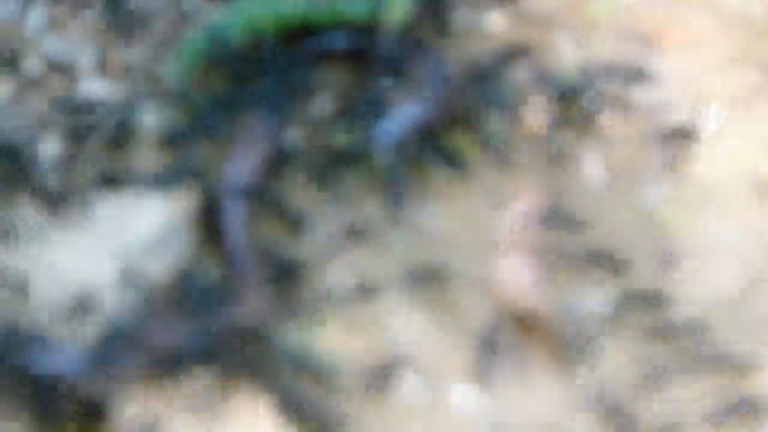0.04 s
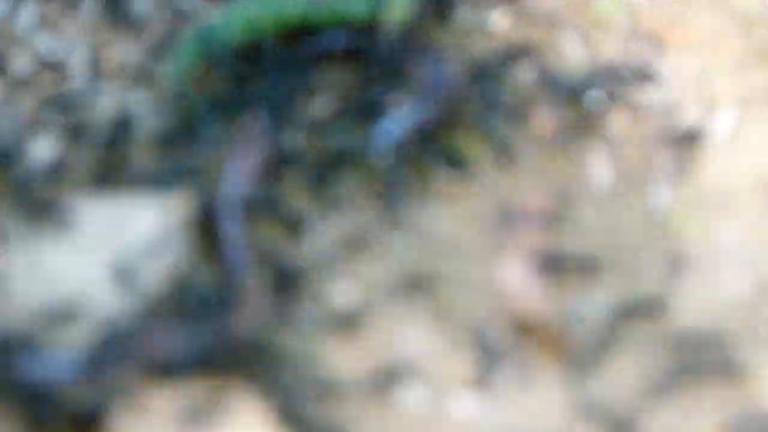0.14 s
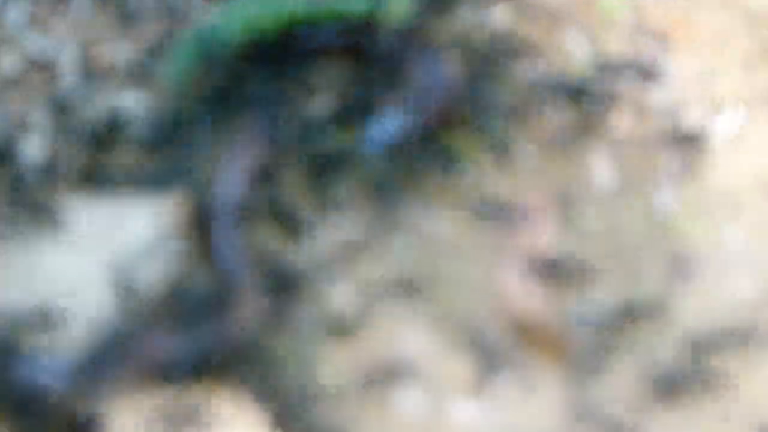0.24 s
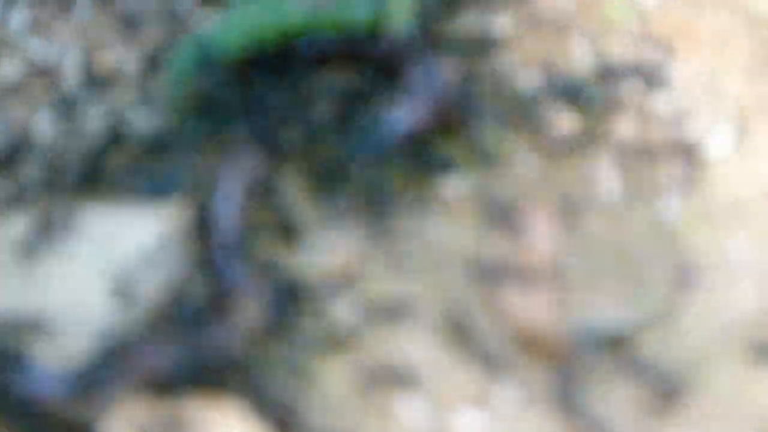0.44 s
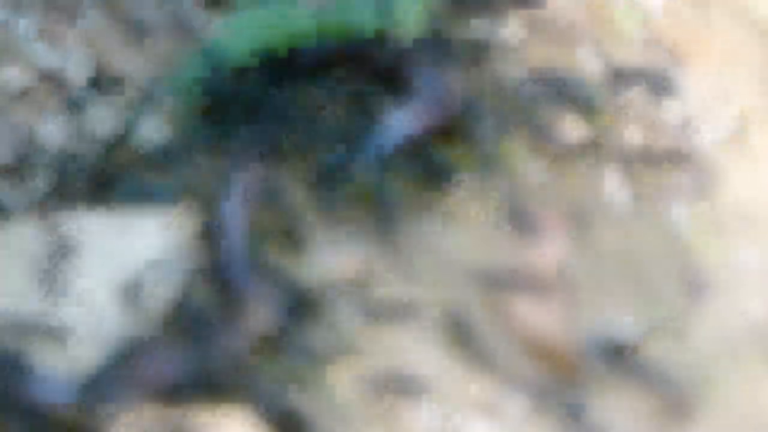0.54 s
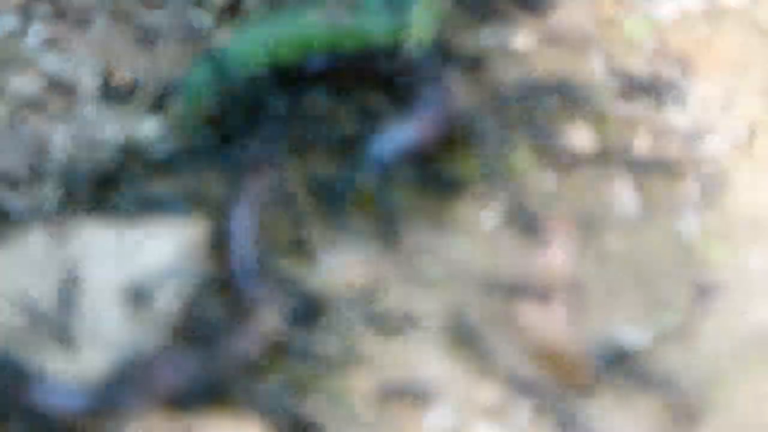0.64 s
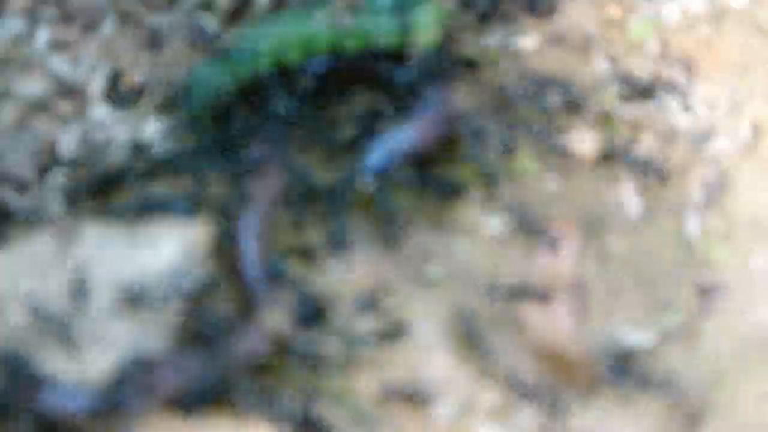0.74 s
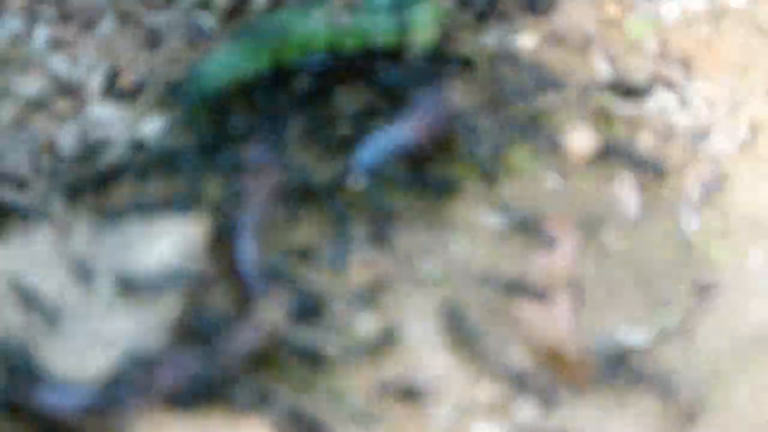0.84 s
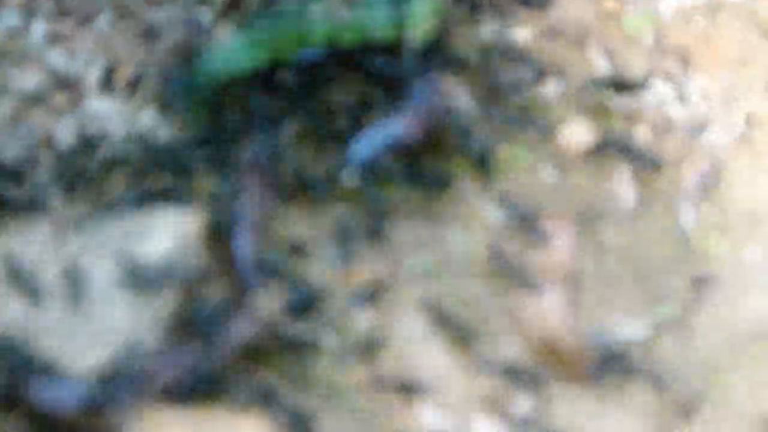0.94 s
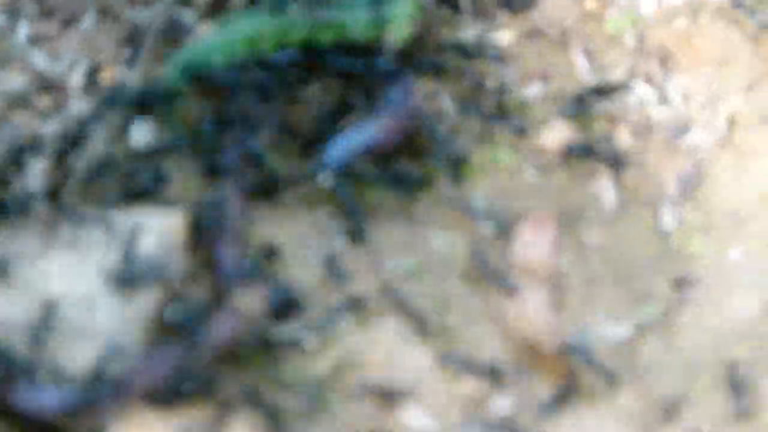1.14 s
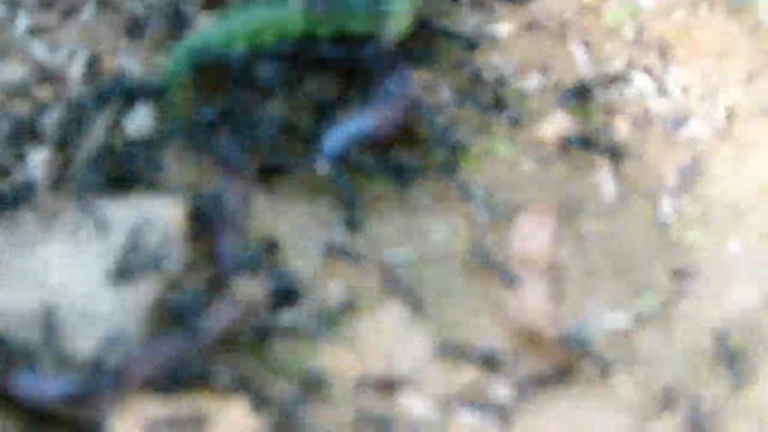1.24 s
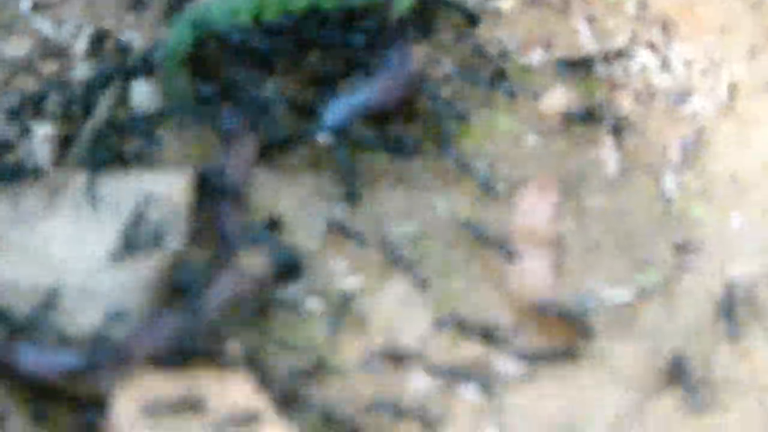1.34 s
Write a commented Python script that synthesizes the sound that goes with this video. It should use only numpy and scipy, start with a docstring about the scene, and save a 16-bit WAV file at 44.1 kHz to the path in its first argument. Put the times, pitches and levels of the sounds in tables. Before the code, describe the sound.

One sharp plastic handling click and a few tiny ticks over steady faint outdoor hiss.

```python
"""A quiet spot outdoors, heard through the two microphone ports of a camera held close to the ground.
From the start there is a steady bed of hiss, a faint hum and the camera's own thin whine.
A tiny tick comes from the grip; then, at 0.14 s, one sharp handling click rings the plastic case
right beside the ports. Soft rubs and two more ticks follow up to 0.6 s, and a last tick at 1.25 s."""
import sys
import numpy as np
from scipy import signal
from scipy.fft import rfft, irfft
from scipy.io import wavfile

SR = 44100
rng = np.random.default_rng(int(sys.argv[2]) if len(sys.argv) > 2 else 0)


def pcm_store(signal):
    """Save signal as 16-bit PCM."""
    levels = np.round(np.clip(np.atleast_2d(signal), -1, 1) * 32767)
    wavfile.write(sys.argv[1], SR, levels.astype(np.int16).T)


N = 61739

# spectrum of the background hiss (frequency [Hz], relative density [dB])
HISS_SPECTRUM = [(25, -30), (70, -25.5), (130, -25.5), (215, -19), (370, -10.5), (560, -11), (760, -3),
                 (930, -8.5), (1130, -5.5), (1450, -9), (1950, -5.5), (2300, -7.5), (2600, -7), (3700, -7),
                 (5300, -4), (7500, -10.5), (9600, -11.5), (13000, -15.5), (15700, -26)]
# how alike the hiss is at the two ports (frequency [Hz], coherence [0-1])
PORT_COHERENCE = [(50, 0.1), (150, 0.85), (600, 0.74), (1050, 0.03), (1600, 0.64), (3500, 0.3),
                  (5200, 0.98), (9000, 0.3), (13000, 0.42), (15500, 0.1)]
# tilt of the hiss toward the right port (frequency [Hz], right over left before panning [dB])
HISS_RIGHT_LIFT = [(1200, -0.5), (2300, 2), (4500, 2), (8000, .5), (13000, 0)]
# slight rise and fall of the hiss (time [s], gain [dB])
HISS_SWELL = [(0, -2), (.12, -1), (.25, -2), (.45, -0.7), (.7, 0.5), (1.0, 0), (1.4, -0.1)]
# tones of the hum (frequency [Hz], relative level [dB])
HUM_TONES = [(287, -77), (380, -71), (467.3, -64), (702, -66)]
# swell of the strongest hum tone (time [s], gain [dB])
HUM_SWELL = [(0, -14), (.3, 1.5), (.58, 3.5), (.8, 1.5), (.95, -13), (1.1, 0), (1.35, 4)]
# tones from inside the camera (frequency [Hz], relative level [dB])
WHINE_TONES = [(1637, -74), (1820, -71), (2519, -71), (2573, -58.7), (2616, -72), (2708, -72), (2762, -72),
               (3268, -63), (3919, -74), (4947, -71), (5184, -71), (5652, -70)]
# rise and fall of the whine (time [s], gain [dB])
WHINE_SWELL = [(0, -1.5), (.35, -2), (.5, 0.5), (.65, -.5), (.73, 1.5), (.83, 0), (.9, 2), (1.0, -0.5),
               (1.08, 1.5), (1.4, 0.5)]
# scuffs of the grip (time [s], level [dB], centre [Hz], length [s])
GRIP_RUBS = [(0.214, -55, 750, 0.013), (0.228, -50.5, 2260, 0.011), (0.353, -54, 5200, 0.018),
             (0.474, -51.5, 560, 0.019), (0.584, -59, 13500, 0.006)]
# ticks under the fingers (time [s], level [dB], centre [Hz], width [octaves], t60 [s])
FINGER_TICKS = [(.0806, -26.5, 11800, 0.22, 0.004), (.3432, -38, 5300, 0.2, 0.014),
                (.579, -34, 11200, 0.28, 0.0035), (1.248, -38.5, 9900, .17, 0.005)]
# modes of the plastic case (frequency [Hz], relative level [dB], t60 [s], left over right [dB])
CASE_MODES = [(420, -35, 0.031, -9.5), (593, -32, 0.065, 0), (816, -24, 0.066, -7),
              (928, -20.5, 0.019, -8.5), (1133, -16, 0.044, -7), (1420, -21.5, 0.024, -15),
              (1630, -23, 0.015, 8), (2413, -21.5, 0.0067, 1), (3107, -21, 0.01, -14.5),
              (4196, -17.5, 0.0072, -12), (6170, -19.5, 0.007, 4), (6700, -22, 0.022, 9.5),
              (9134, -15, 0.015, -4), (12500, -23.5, 0.0061, -8)]
# spectrum of the contact's crack (frequency [Hz], relative density [dB])
CRACK_SPECTRUM = [(200, -24), (500, -15), (1500, -6), (2000, -11), (2600, 0), (4500, 5.5), (6500, 4.5),
                  (8300, -0.5), (10000, -5), (13000, -3), (16000, -12)]

PORT_LAG_S, CLICK_LAG_S = 4.2e-5, 0.00037  # delays at the left port: background, ringing case
HISS_DB, HISS_FLICKER_DB = -46, 0.2
HUM_GAIN_DB, WHINE_GAIN_DB, CLICK_GAIN_DB = -1.5, -0.13, -1.5
WHINE_PAN_DB, WHINE_FLUTTER_DEPTH = -4.5, 0.35
CLICK_S, CLICK_LOW_CUT_HZ = 0.1375, 318
CRACK_GAIN_DB, TAIL_GAIN_DB, THUMP_GAIN_DB = -11.5, -24.5, -37
CRACK_OPPOSED = 0.28  # share of the crack that shakes the two ports in opposite directions
TOP_HZ = 15850

TIMES = np.arange(N) / SR
FREQS = np.fft.rfftfreq(N, 1 / SR)


def undb(db):
    """Decibels to gain."""
    return 10 ** (np.asarray(db) / 20)


def pan(db):
    """Gains for the two ports, with the left louder by db."""
    return undb(np.array([[db], [-db]]) / 2)


def curve(rows):
    """A level curve as a gain for each sample."""
    return undb(np.interp(TIMES, *np.array(rows).T))


def by_bin(rows):
    """Points joined on a log-frequency axis."""
    hz, value = np.array(rows).T
    return np.interp(np.log(FREQS + 1), np.log(hz), value)


def unit(x):
    """Scale to rms 1."""
    return x / np.sqrt(np.mean(x ** 2))


def noise(gain):
    """Two unrelated noises shaped by a gain per frequency, at rms 1."""
    return unit(irfft(rfft(rng.standard_normal((2, N))) * gain, N))


def band(hz, octaves):
    """Two unrelated noises in a bell-shaped band."""
    return noise(np.exp(-.5 * (np.log2((FREQS + 1) / hz) / octaves) ** 2))


def walk(rate_hz):
    """A slow random wander of size about 1."""
    return noise(1 / (1 + (FREQS / rate_hz) ** 2))[0]


def fade(start, t60, rise_s=1 / SR):
    """A quick rise and an exponential decay."""
    age = np.maximum(TIMES - start, 0)
    return np.minimum(age / rise_s, 1) * np.exp(-np.log(1000) * age / t60)


def mode(start, hz, t60):
    """One decaying vibration."""
    return fade(start, t60) * np.sin(2 * np.pi * hz * (TIMES - start))


def tone(hz, db, pan_db, waver, drift_hz):
    """A slightly unsteady tone that reaches the left port a little later."""
    turns = np.cumsum(hz + drift_hz * walk(5.3)) / SR + rng.random()
    wave = np.sin(2 * np.pi * (turns - hz * np.array([[PORT_LAG_S], [0]])))
    return np.sqrt(2) * undb(db) * pan(pan_db) * wave * (1 + waver * walk(8.0))


def hiss():
    """The bed of the place: smooth air, alike at both ports in some bands and diffuse in others."""
    common, separate = rfft(rng.standard_normal((2, N)))
    coherence = np.clip(by_bin(PORT_COHERENCE), 0, 1)
    delay = np.exp(-2j * np.pi * FREQS * PORT_LAG_S)
    lift = undb(by_bin(HISS_RIGHT_LIFT) / 2)
    left = (coherence * common + np.sqrt(1 - coherence ** 2) * separate) * delay
    ports = np.array([left / lift, common * lift])
    air = unit(irfft(ports * undb(by_bin(HISS_SPECTRUM)), N))
    return air * pan(-1) * curve(HISS_SWELL) * undb(HISS_DB + HISS_FLICKER_DB * walk(15))


def hum():
    """Four faint low tones down in the bed; the strongest swells and sinks."""
    lowest, low, strong, high = (tone(hz, db, pan_db=-1.5, waver=0.21, drift_hz=1.4)
                                 for hz, db in HUM_TONES)
    return undb(HUM_GAIN_DB) * (lowest + low + strong * curve(HUM_SWELL) + high)


def whine():
    """Thin fluttering tones from inside the camera, with a narrow rasp around the strongest."""
    flutter = 1 + WHINE_FLUTTER_DEPTH * band(hz=46, octaves=0.29)[0]
    tones = sum(tone(hz, db, WHINE_PAN_DB, waver=0.2, drift_hz=1.54) for hz, db in WHINE_TONES)
    rasp = undb(-67) * pan(WHINE_PAN_DB) * band(hz=2580, octaves=0.04)[0]
    return undb(WHINE_GAIN_DB) * curve(WHINE_SWELL) * (flutter * tones + rasp)


def rubs():
    """Handling noise: brief soft scuffs as the grip shifts, a little right of centre."""
    scuffs = np.zeros(N)
    for time, db, hz, length in GRIP_RUBS:
        swell = np.exp(-2 * ((TIMES - time) / length) ** 2)
        scuffs += undb(db) * band(hz, octaves=0.18)[0] * swell
    return scuffs * pan(-2.5)


def ticks():
    """Tiny bright ticks of the case under the fingers, close to the microphones."""
    return sum(undb(db) * band(hz, octaves) * fade(time, t60, rise_s=0.0002)
               for time, db, hz, octaves, t60 in FINGER_TICKS)


def contact_crack():
    """The bright edge of the click: a burst of noise that hits both ports at once."""
    right, separate = noise(undb(by_bin(CRACK_SPECTRUM)))
    left = np.sqrt(1 - CRACK_OPPOSED ** 2) * separate - CRACK_OPPOSED * right
    burst = fade(CLICK_S, t60=0.01, rise_s=0.0003)
    return undb(CRACK_GAIN_DB) * pan(-4.5) * np.array([left, right]) * burst


def click():
    """Right beside the ports the case cracks, rings with a short dull tail and rocks with a low thump."""
    arrival = CLICK_S + np.array([[CLICK_LAG_S], [0]])  # right port first
    ring = sum(undb(db) * pan(pan_db) * mode(arrival, hz, t60) * (-1) ** k
               for k, (hz, db, t60, pan_db) in enumerate(CASE_MODES))
    crack = contact_crack()
    tail = undb(TAIL_GAIN_DB) * pan(-7.5) * band(hz=1320, octaves=1.15)[0] * fade(arrival, t60=0.029)
    rocking = np.array([[-1], [1]])  # the ports move in opposite directions
    thump = undb(THUMP_GAIN_DB) * pan(2.5) * rocking * mode(CLICK_S, hz=315, t60=0.062)
    low_cut = signal.butter(3, CLICK_LOW_CUT_HZ, "high", fs=SR, output="sos")
    return undb(CLICK_GAIN_DB) * signal.sosfilt(low_cut, ring + crack + tail + thump)


def scene():
    """Everything that reaches the left and right microphone ports."""
    return hiss() + whine() + hum() + click() + ticks() + rubs()


def record(dry):
    """The camera's recorder cuts the top treble steeply."""
    return signal.sosfilt(signal.ellip(10, .2, 80, TOP_HZ, fs=SR, output="sos"), dry)


dry = scene()
out = record(dry)
pcm_store(out)
```